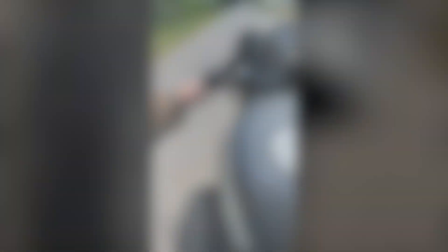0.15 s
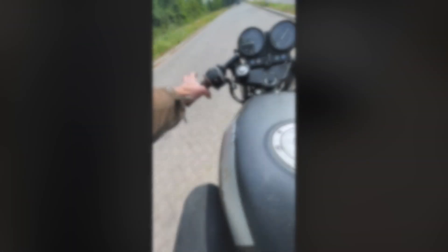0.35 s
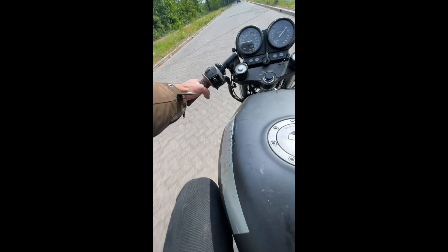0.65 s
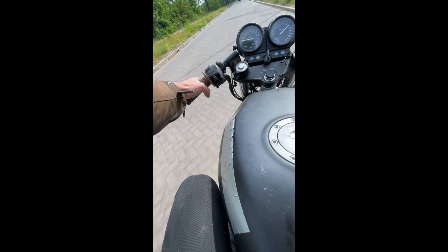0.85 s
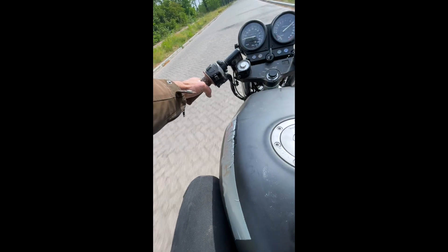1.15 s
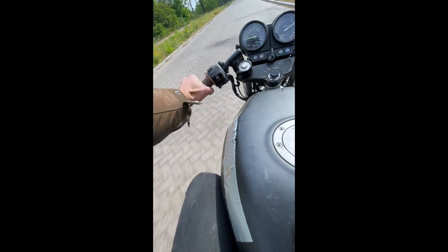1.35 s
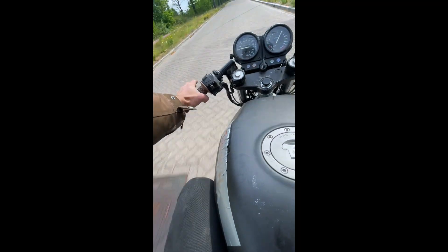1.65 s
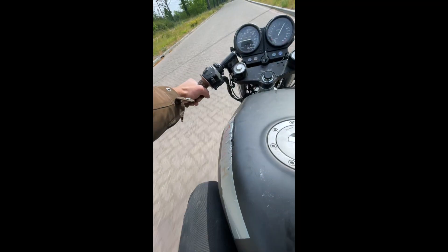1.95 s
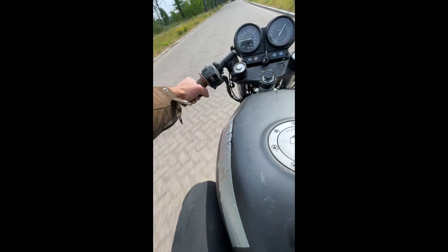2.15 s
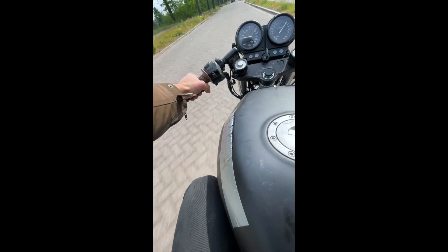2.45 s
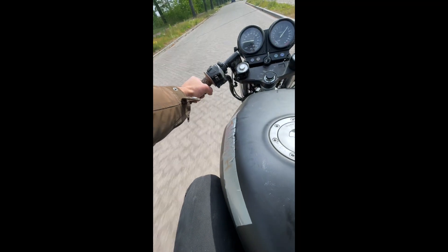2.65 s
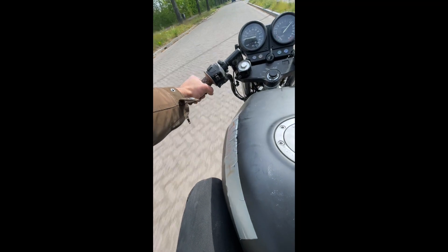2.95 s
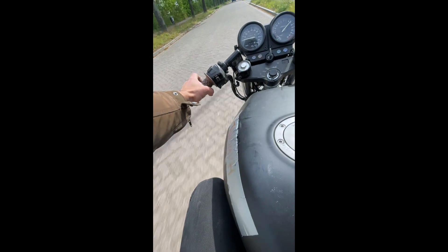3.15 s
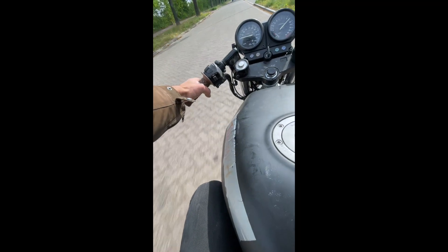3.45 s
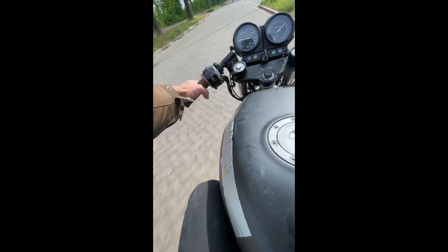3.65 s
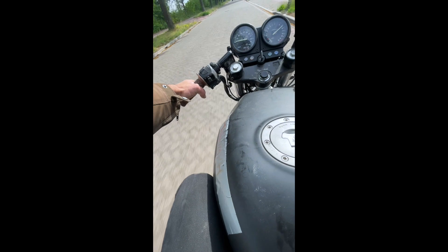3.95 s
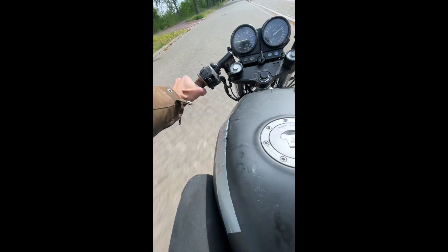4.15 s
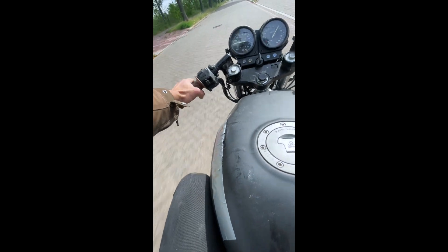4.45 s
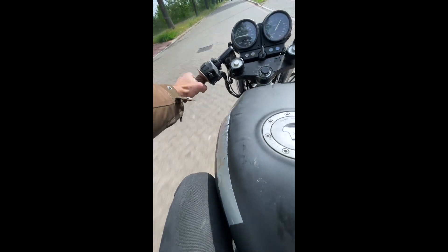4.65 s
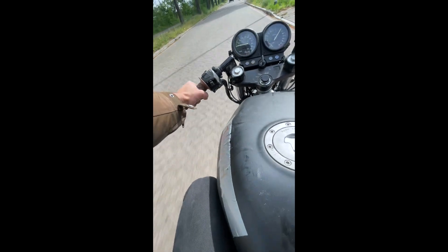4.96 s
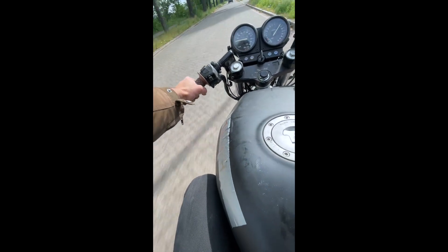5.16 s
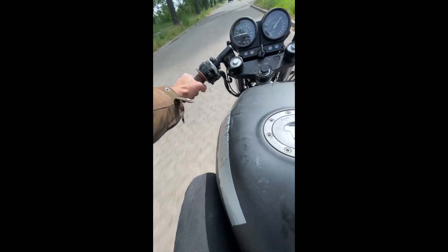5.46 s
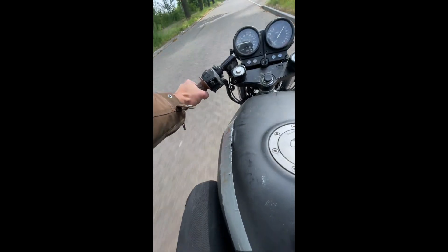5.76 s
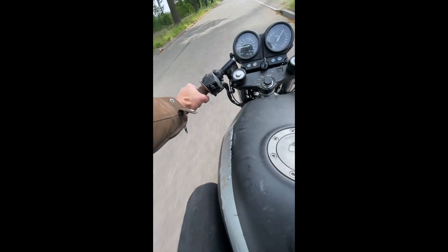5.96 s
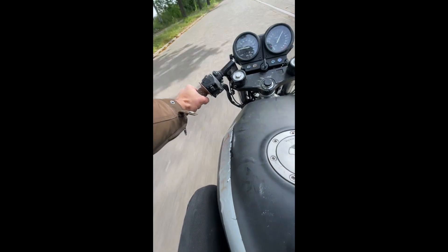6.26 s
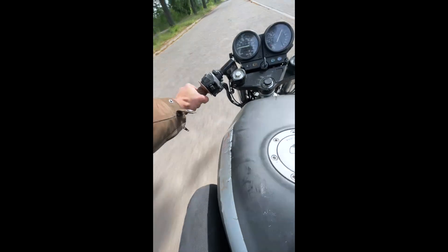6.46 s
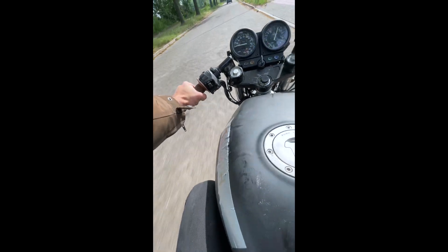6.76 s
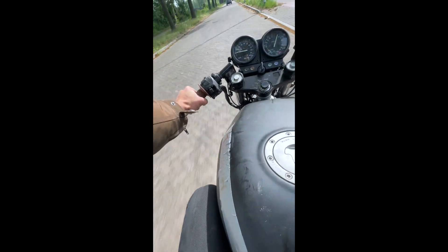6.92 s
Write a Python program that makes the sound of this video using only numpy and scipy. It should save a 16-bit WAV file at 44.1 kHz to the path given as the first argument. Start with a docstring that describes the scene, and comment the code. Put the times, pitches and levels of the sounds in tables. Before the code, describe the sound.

Heard from the saddle, a motorcycle engine climbs, drops and climbs through gear changes, then goes quiet and sinks, with wind, tyre noise and jolts.

```python
"""On a brick road, from the saddle: a four-cylinder motorcycle pulls through three gears, then coasts.
The firing tone booms in the airbox as low sines; upper orders ring in the exhaust and gear teeth whine.
Wind and tyres rumble on the one microphone as shaped noise, and paving joints strike ringing modes.
A buzz and bright ticks open the ride, a squeak falls in pitch, an insect trills at the roadside
and a limiter holds the peaks."""
import sys
import numpy as np
from scipy import signal
from scipy.io import wavfile
from scipy.ndimage import uniform_filter1d, minimum_filter1d

SR = 44100
rng = np.random.default_rng(int(sys.argv[2]) if len(sys.argv) > 2 else 0)


def generate_wav(signal):
    """Clip the signal to [-1, 1] and save it as 16-bit WAV at the path in sys.argv[1]."""
    frames = np.transpose(np.atleast_2d(signal))
    scaled = np.clip(frames, -1, 1) * 32767
    pcm = np.round(scaled).astype(np.int16)
    wavfile.write(sys.argv[1], SR, pcm)


def volts_from_db(level):
    """Convert decibel levels to linear amplitude ratios."""
    exponent = np.asarray(level, float) / 20
    return 10 ** exponent


N = 312669


def in_time(rows):
    """Columns of a curve table whose first column is time, one value a sample."""
    s, *columns = np.transpose(rows)
    return [np.interp(np.arange(N) / SR, s, column) for column in columns]


def rms_one(x):
    """Scale to rms 1."""
    return x / np.sqrt(np.mean(x ** 2) + 1e-20)


def drift(rate):
    """Slow chance of spread 1, moving about rate times a second."""
    r = np.exp(-80 * np.pi * rate / SR)
    white = rng.standard_normal(N // 40 + 2002)   # one value every 40 samples
    slow = signal.lfilter([1], [1, -2 * r, r * r], white)[2000:]
    return np.interp(np.arange(N) / 40, np.arange(len(slow)), rms_one(slow))


def ring(clicks, hz, t60):
    """A unit click sets a decaying sine of height 1 ringing; t60 in seconds."""
    r, w = volts_from_db(-60 / (t60 * SR)), 2 * np.pi * hz / SR
    return signal.lfilter([0, np.sin(w)], [1, -2 * r * np.cos(w), r * r], clicks + 1e-18)


def band(x, low_hz, high_hz):
    """Band-pass."""
    return signal.sosfilt(signal.butter(2, [low_hz, high_hz], "band", fs=SR, output="sos"), x)


def lift(x, peaks):
    """Raise each resonance (Hz, width in Hz, lift in dB) above a flat response."""
    out = x
    for hz, width, lift_db in peaks:
        r = np.exp(-np.pi * width / SR)
        poles = [1, -2 * r * np.cos(2 * np.pi * hz / SR), r * r]
        resonance = signal.lfilter([(1 - r * r) / 2, 0, (r * r - 1) / 2], poles, x)
        out = out + (volts_from_db(lift_db) - 1) * resonance
    return out


def patchy_noise(spectrum, shared, own_db, own_rate):
    """Half-octave noise bands, each with a flicker of its own, under one shared gain; rms 1."""
    hz, db = np.transpose(spectrum)
    edges = 25 * 2 ** np.arange(0, 9.6, 0.5)
    white, out = rng.standard_normal((2, N)), 0
    for k, (low, high) in enumerate(zip(edges, edges[1:])):
        level_db = np.interp(np.log(low * high) / 2, np.log(hz), db, left=-200, right=-200)
        if level_db > -100:
            # neighbouring bands take different noise
            out = out + volts_from_db(level_db + own_db * drift(own_rate)) * band(white[k % 2], low, high)
    return rms_one(out * shared)


def strike(times, blows_db, modes, spread_db):
    """Every blow strikes each mode with its own strength and sign; loose parts answer a few ms apart."""
    out = np.zeros(N)
    luck = rng.standard_normal((len(times), len(modes), 3))
    for k, (hz, level_db, t60) in enumerate(modes):
        late_s = 0.0015 * np.abs(luck[:, k, 2])
        at = np.minimum((times + late_s) * SR, N - 1).astype(int)
        height = volts_from_db(blows_db + level_db + spread_db * luck[:, k, 0])
        clicks = np.zeros(N)
        clicks[at] = height * np.sign(luck[:, k, 1])
        out += ring(clicks, hz, t60)
    return out


# Insect at the roadside. Each row: start in seconds, length in seconds.
CHIRPS = [(6.588, 0.1), (6.71, 0.042)]


def insect():
    """A train of wing strokes, 95 a second, gates noise in a band near 8 kHz."""
    level_db, edge_s = -65.5, 0.015
    t = np.arange(N) / SR
    on = sum(np.clip(np.minimum(t - s, s + length - t) / edge_s + 0.5, 0, 1) for s, length in CHIRPS)
    strokes = np.maximum(np.sin(2 * np.pi * 95 * t), 0) ** 2
    trill = rms_one(strokes * band(rng.standard_normal(N), 7000, 9800))
    return volts_from_db(level_db) * on * trill


# Spectrum of the wind rumble on the microphone. Each row: frequency in Hz, density in relative dB per Hz.
RUMBLE_SPECTRUM = [(18, -42.5), (30, -20), (70, 2), (190, -2), (250, -28), (420, -120)]


def wind_rumble(gust, rumble_db):
    """Lumpy low noise of the wind, humming with the frame."""
    noise = patchy_noise(RUMBLE_SPECTRUM, volts_from_db(0.79 * gust + 0.43 * drift(45)), own_db=3.0, own_rate=8.6)
    return volts_from_db(rumble_db) * rms_one(lift(noise, [(71, 3.5, 2.3)]))   # the frame hums near 71 Hz


# Spectrum of the tyres on the bricks. Each row: frequency in Hz, density in relative dB per Hz.
TYRE_SPECTRUM = [(100, -26), (170, -6), (214, 1), (279, -2.5), (618, -8), (1000, -22.5), (1300, -48.5),
                 (2200, -120)]


def tyres(gust, rumble_db):
    """Tyre noise follows part of the rumble's swing."""
    level_db, follow = -36.5, 0.69   # level when the rumble is at -33.5 dB; share of its swing
    tyre_db = level_db + follow * (np.minimum(rumble_db, -30) + 33.5)
    return volts_from_db(tyre_db) * patchy_noise(TYRE_SPECTRUM, volts_from_db(2.7 * gust + 1.6 * drift(50)), own_db=1.5, own_rate=8.4)


# Spectrum of the roar. Each row: frequency in Hz, density in relative dB per Hz.
ROAR_SPECTRUM = [(240, -43), (400, -7), (530, 0), (889, -11), (1070, -5.5), (1190, -10), (1300, -10.5),
                 (2010, -21), (3500, -22.5), (4550, -58), (7700, -120)]


def roar(gust, puff, roar_db):
    """Mid-range noise puffed out with each firing."""
    shared = puff * volts_from_db(1.87 * gust + 2.1 * drift(84))
    return volts_from_db(roar_db) * patchy_noise(ROAR_SPECTRUM, shared, own_db=0.0, own_rate=13)


# Spectrum of the valve hiss. Each row: frequency in Hz, density in relative dB per Hz.
HISS_SPECTRUM = [(1470, -31.5), (2500, -6), (3030, -8), (3430, -8.5), (4420, -7), (5570, -12), (7010, -13),
                 (11200, -26), (15700, -25)]
# Resonances of the engine casing, shared with the whine. Each row: frequency in Hz, width in Hz, lift in dB.
CASING = [(1970, 110, 6), (2720, 130, 1), (2985, 170, 4), (4280, 190, 2), (4880, 69, 5), (5300, 59, 3),
          (7000, 210, 5.5), (9600, 220, 3.5), (12200, 80, 2)]


def valve_hiss(gust, puff, orders_db):
    """Hiss rings in the engine casing, follows the smoothed load and settles from a louder start."""
    level_db, follow, smooth_s = -53.5, 0.39, 0.15   # settled level at orders of -38.5 dB; share of swing
    start_db, settle_s = 8.5, 0.52
    load_db = uniform_filter1d(orders_db, size=int(smooth_s * SR))
    hiss_db = level_db + follow * (load_db + 38.5)
    hiss_db = hiss_db + start_db * np.exp(-np.arange(N) / SR / settle_s)
    shared = puff ** 0.38 * volts_from_db(0.27 * gust + 0.25 * drift(60))
    noise = patchy_noise(HISS_SPECTRUM, shared, own_db=0.73, own_rate=14)
    return volts_from_db(hiss_db) * rms_one(lift(noise, CASING))


# Wind and road at the saddle. Each row: time in seconds, rumble level in dB, roar level in dB.
RUSH = [(0.0, -20, -38), (0.14, -47, -40.5), (0.3, -29, -37), (0.65, -31, -31), (0.9, -33.5, -34),
        (1.22, -34.5, -37.5), (1.4, -38.5, -42), (2.0, -32, -38), (2.55, -38.5, -39), (2.8, -29, -33.5),
        (3.3, -33, -38), (3.9, -34.5, -35), (4.05, -44, -41), (4.19, -34, -41.5), (4.35, -39.5, -46.5),
        (4.7, -32.5, -40), (5.1, -31, -38), (5.3, -32.5, -45), (5.9, -36, -41), (6.4, -37, -41.5),
        (6.7, -32, -48), (7.09, -35, -43.5)]


def rush(turn, orders_db):
    """Wind, tyres, roar and hiss share gusts; roar and hiss pulse with the firings."""
    rumble_db, roar_db = in_time(RUSH)
    gust = drift(14.4)   # lifts all layers together
    puff = 1 + 0.17 * np.cos(turn) + 0.084 * np.cos(turn / 4)   # each firing, and each four
    low = wind_rumble(gust, rumble_db) + tyres(gust, rumble_db)
    return low + roar(gust, puff, roar_db) + valve_hiss(gust, puff, orders_db)


# Wind slaps on the microphone. Each row: time in seconds, level before flutter in dB.
BUFFETS = [(0.702, -41), (.76, -33.5), (0.848, -41.5), (0.969, -39.5), (1.039, -36.5), (1.085, -44.5),
           (1.593, -46.5), (3.873, -49), (4.79, -52.5), (6.813, -55)]


def buffets():
    """Short slaps of turbulent air on the microphone: swells of fluttering noise."""
    half_s = 0.022
    t = np.arange(N) / SR
    swell = sum(volts_from_db(db) * np.exp(-((t - s) / half_s) ** 2) for s, db in BUFFETS)
    return swell * volts_from_db(3.4 * drift(70)) * rms_one(band(rng.standard_normal(N), 1200, 2700))


# The harder jolts. Each row: time in seconds, rattle strength in dB, thud strength in dB.
JOLTS = [(0.0693, -25, -31.5), (0.4734, -27, -22.5), (0.8345, -28, -29.5), (1.0091, -33.5, -33),
         (1.3721, -33, -29), (1.526, -51, -44.5), (1.5698, -33, -32.5), (1.592, -29.5, -32),
         (1.8441, -31, -26.5), (1.9178, -31, -28.5), (2.83, -25.5, -22.5), (2.8762, -32, -41.5),
         (2.9711, -32, -40.5), (3.103, -34.5, -30), (3.5181, -25, -27), (3.557, -29, -19.5),
         (3.7406, -22, -33.5), (3.8472, -28.5, -23.5), (4.105, -32.5, -28), (4.344, -40.5, -45),
         (4.401, -38, -32.5), (4.469, -48, -35), (4.4905, -37, -33.5), (4.5146, -43, -34),
         (4.546, -36, -31.5), (4.6305, -27, -32.5), (4.7872, -26.5, -30), (4.8267, -32, -27),
         (4.8439, -26, -26), (5.0135, -29, -33), (5.2864, -32.5, -25.5), (5.4445, -36, -30),
         (5.4918, -27.5, -24), (5.5404, -41.5, -29.5), (5.7276, -26, -25), (5.8193, -31, -21.5),
         (5.9087, -34.5, -24.5), (5.9487, -40, -29.5), (6.3842, -46, -27), (6.505, -49, -53),
         (6.5874, -50, -44), (6.792, -45, -33), (6.8045, -33.5, -30), (6.9687, -41, -29),
         (7.0394, -42, -30)]
# Thud modes of the frame. Each row: frequency in Hz, relative level in dB, 60 dB decay time in seconds.
FRAME = [(136, 3, .05), (333, -1.5, 0.11), (492, 6, 0.021), (720, -1, 0.006), (1000, 0, 0.0081)]
# Rattle modes of the fittings. Each row: frequency in Hz, relative level in dB, 60 dB decay in seconds.
FITTINGS = [(1530, 3, 0.0054), (2280, 0, 0.0041), (3060, -10, 0.0033), (3660, -8, 0.005),
            (4900, -14.5, 0.0056), (7400, -20, .004)]


def jolts():
    """Paving joints: a dull thud in the frame and a rattle of fittings; smaller ones come at random."""
    small_rattle_db, small_thud_db = -59, -44.5   # base strengths, before each mode's chance
    s, rattle_db, thud_db = np.transpose(JOLTS)
    small = np.sort(rng.uniform(0, N / SR, size=220))
    above_db = 2 * np.minimum(rng.exponential(1, size=220), 3.5)
    rattle = strike(s, rattle_db, FITTINGS, 1.1) + strike(small, small_rattle_db + above_db, FITTINGS, 2.8)
    thud = strike(s, thud_db, FRAME, 3.5) + strike(small, small_thud_db + above_db, FRAME, 2.1)
    return rattle + thud


def squeak():
    """A rough whistle as the gear engages: it drops in pitch and dies."""
    start_s, level_db, decay_s = 1.662, -55, 0.03   # level before flutter and envelope
    end_hz, fall_hz = 4930, 450
    age = np.clip(np.arange(N) / SR - start_s, 0, 1)
    hz = end_hz + fall_hz * np.exp(-age / 0.012)
    envelope = (1 - np.exp(-age / 0.0036)) * np.exp(-age / decay_s)
    return volts_from_db(level_db + 6.0 * drift(90)) * envelope * np.sin(2 * np.pi * np.cumsum(hz) / SR)


SHUDDER_HZ, SHUDDER_PEAK_S = 71.8, 0.047   # mean rate and loudest moment, for ticks and buzz


def chain():
    """Short bright noise ticks, about one per beat of the shudder, strongest near its peak, then fading."""
    level_db, fall_db_per_s, spread_db, t60_s = -42, 54.5, 5.5, 0.032   # level: mean at the peak
    luck = rng.standard_normal((24, 2))
    s = (np.arange(24) + 0.24 + 0.067 * luck[:, 0]).clip(0) / SHUDDER_HZ
    tick_db = level_db - fall_db_per_s * np.abs(s - SHUDDER_PEAK_S) + spread_db * luck[:, 1]
    clicks = np.zeros(N)
    clicks[(s * SR).astype(int)] = volts_from_db(tick_db)
    envelope = signal.lfilter([1], [1, -volts_from_db(-60 / (t60_s * SR))], clicks)
    return envelope * rms_one(band(rng.standard_normal(N), 8000, 15500))


def buzz():
    """Five multiples of the wavering shudder rate swell, fade and stop."""
    level_db, rise_db_per_s, fall_db_per_s = -20.5, 220, 49   # multiple k peaks 1.5 k dB below this level
    end_s, fade_s = 0.26, 0.031
    t = np.arange(N) / SR
    db = level_db - np.maximum(rise_db_per_s * (SHUDDER_PEAK_S - t), fall_db_per_s * (t - SHUDDER_PEAK_S))
    turn = 2 * np.pi * np.cumsum(SHUDDER_HZ * (1 + 0.04 * drift(5))) / SR
    tones = sum(volts_from_db(-1.5 * k) * np.sin(k * turn + k * k) for k in range(1, 6))
    return volts_from_db(db) * np.clip((end_s - t) / fade_s, 0, 1) * tones


# Gear and cam-chain whine. Each row: multiple of the firing rate, relative strength in dB.
WHINE = [(10.25, -22), (11.0, -16), (11.7, -21.5), (12.5, -23.5), (13.0, -24), (15.6, -18), (16.8, -29),
         (18.3, -22), (20.4, -26), (21.8, -28.5), (22.5, -23), (36.7, -46)]


def whine(turn, orders_db):
    """Meshing teeth under load, standing out where they meet a casing resonance."""
    teeth = sum(volts_from_db(db + 3.5 * drift(6) - 2.5) * np.sin(k * turn + 1.8 * drift(25)) for k, db in WHINE)
    return volts_from_db(orders_db) * (lift(teeth, CASING) - 0.41 * teeth)   # less of the direct sound


# Upper exhaust orders. Each entry: multiple of the firing rate.
ORDERS = [2.25, 2.75, 3, 3.25, 3.75, 4, 4.25, 4.5, 4.75, 5, 5.25, 5.5, 5.75, 6, 6.25, 6.5, 7, 7.5, 8]
# Strengths of those orders. Each entry: relative level in dB.
ORDERS_DB = [-9.5, -10.5, -6.5, -7, -9, -1, -4, -11, -3.5, -2, -12, -4.5, -7.5, -4, -12.5, -14.5, -2.5,
             -8.5, -5]
# Response of the exhaust pipe. Each row: frequency in Hz, gain in dB.
PIPE = [(500, -2.5), (620, -9.5), (690, 0), (760, -5), (850, -13), (930, -4.5), (995, -5), (1045, 2),
        (1085, 2), (1130, -5.5), (1160, -17), (1205, -15), (1240, -4), (1300, -5.5), (1370, -6),
        (1450, -5.5), (1520, -5.5), (1610, -7), (1700, -12.5), (1800, -10), (1950, -17), (2200, -19)]


def exhaust(turn, firing_hz, orders_db):
    """Upper orders, each with its own phase, swell and sink as they cross the pipe's peaks and notches."""
    phases = rng.normal(0, 1.7, len(ORDERS))   # loosely in step, so the firings rasp
    hz, pipe_db = np.transpose(PIPE)
    uneven = turn + 0.08 * drift(14)   # the crank runs a little unevenly
    out = 0
    for k, db, phase in zip(ORDERS, ORDERS_DB, phases):
        level_db = orders_db + db + np.interp(k * firing_hz, hz, pipe_db) + 1.5 * drift(5)
        out = out + volts_from_db(level_db) * np.cos(k * uneven + phase + 0.25 * drift(6))
    return out


# Brief dips of the boom. Each row: time in seconds, depth in dB, half length in seconds.
DIPS = [(0.951, 5.5, 0.027), (2.317, 1.5, 0.013), (2.968, 2.5, 0.014), (3.573, 3.5, 0.012),
        (3.725, 1, 0.0029), (3.865, 4.5, 0.011), (5.153, 14, 0.013)]
# Low overtones. Each row: time in seconds, level in dB of the fifth cycle order (1.25 times the firing
# rate), level in dB of the second firing order (twice the rate).
OVERTONES = [(0, -26, -41), (0.15, -30.5, -29), (0.55, -26, -28), (0.75, -40, -43.5), (1.2, -41, -50.5),
             (1.4, -43, -55), (1.62, -55, -48), (1.7, -50, -38), (1.85, -38.5, -37), (2.1, -22.5, -33),
             (2.3, -28, -33), (2.6, -38.5, -37), (3.2, -38.5, -44), (4.05, -52, -50), (4.35, -56, -61.5),
             (4.55, -47, -41.5), (4.8, -31.5, -37), (5.38, -38.5, -40.5), (5.5, -65, -44), (7.09, -44, -63)]


def boom(turn, boom_db):
    """Clean low orders in the airbox; the firing tone wavers a little and dips now and then."""
    fifth_db, second_db = in_time(OVERTONES)
    t = np.arange(N) / SR
    dips_db = sum(depth_db * np.exp(-((t - s) / half) ** 2) for s, depth_db, half in DIPS)
    tone = volts_from_db(boom_db - dips_db + 1.37 * drift(15)) * np.sin(turn + 0.099 * drift(22))
    # one cylinder breathes harder
    fifth = volts_from_db(fifth_db + 3.3 * drift(20)) * np.sin(1.25 * turn + 0.81 * drift(2))
    # sharpens the crests
    second = volts_from_db(second_db + 2.0 * drift(9.1)) * np.sin(2 * turn - np.pi / 2 + 0.17 * drift(2.9))
    return np.sqrt(2) * (tone + fifth + second)


# Engine speed: three pulls, two gear changes with a throttle blip in the second, then coasting.
# Each row: time in seconds, firings per second.
SPEED = [(0, 228), (0.35, 239), (0.55, 248.2), (0.95, 264.8), (1.205, 275), (1.235, 274), (1.36, 250),
         (1.65, 226), (1.78, 220.5), (1.95, 221.8), (2.25, 230.4), (2.65, 241.3), (3.25, 254.5),
         (4.07, 271.3), (4.25, 236), (4.42, 195), (4.52, 255), (4.57, 232), (4.65, 227), (4.95, 233.4),
         (5.4, 241.5), (5.55, 230), (5.8, 231), (6.25, 211.8), (6.55, 201), (7.09, 190)]
# Engine load. Each row: time in seconds, boom level in dB, reference level of the exhaust orders in dB.
ENGINE = [(0.0, -25, -37), (0.3, -19, -31), (0.5, -12, -26.5), (0.75, -12.5, -34), (0.95, -8, -41.5),
          (1.205, -13, -38), (1.235, -28, -50), (1.36, -30, -53.5), (1.42, -57, -53), (1.65, -43, -48.5),
          (1.78, -36, -43.5), (1.95, -18.5, -33), (2.25, -14, -33.5), (2.65, -11.5, -31.5),
          (3.25, -11.5, -38), (4.048, -13, -43.5), (4.08, -33.5, -50), (4.25, -46, -62), (4.42, -49, -67),
          (4.52, -27.5, -46.5), (4.57, -48, -60.5), (4.65, -33, -40), (4.85, -19.5, -40.5),
          (5.15, -18.5, -39), (5.385, -17.5, -36), (5.415, -39, -41), (5.55, -41.5, -54.5),
          (5.8, -39.5, -50), (6.05, -48, -52.5), (6.25, -38.5, -51.5), (6.55, -44.5, -54),
          (6.62, -48, -50.5), (6.72, -48, -56), (6.87, -45, -55.5), (7.09, -34.5, -52.5)]


def scene():
    """Everything reaches one microphone; the engine sounds all follow one crank."""
    (firing_hz,), (boom_db, orders_db) = in_time(SPEED), in_time(ENGINE)
    turn = 2 * np.pi * np.cumsum(firing_hz) / SR   # phase of the firing tone in radians
    surroundings = insect() + rush(turn, orders_db) + buffets() + jolts()
    machine = squeak() + chain() + buzz()
    engine = whine(turn, orders_db) + exhaust(turn, firing_hz, orders_db) + boom(turn, boom_db)
    return (surroundings + machine + engine)[None]


def band_limit(x):
    """A steep low-pass at the top of the band."""
    return signal.sosfilt(signal.butter(12, 15890, fs=SR, output="sos"), x)


def record(dry):
    """The microphone cuts the lowest bass, then a look-ahead limiter holds the peaks."""
    limit_db = -7
    cut = signal.sosfilt(signal.butter(3, 48, "high", fs=SR, output="sos"), dry)
    room = np.minimum(volts_from_db(limit_db) / (np.abs(cut) + 1e-9), 1)
    gain = uniform_filter1d(minimum_filter1d(room, size=301), size=301)   # sizes in samples
    return band_limit(cut * gain)


dry = scene()
out = record(dry)
generate_wav(out)
```